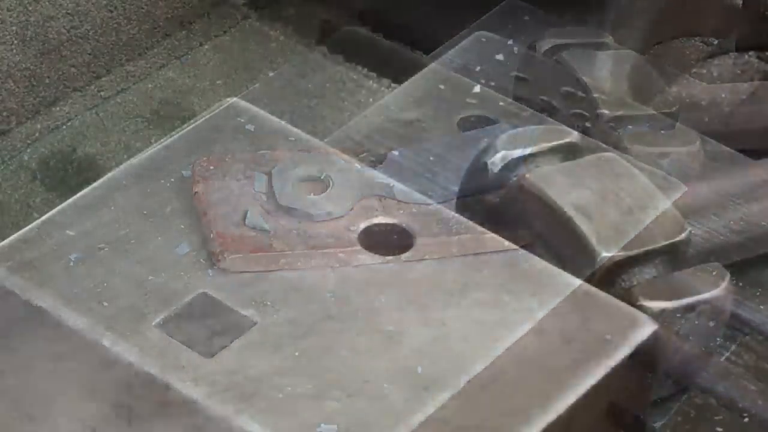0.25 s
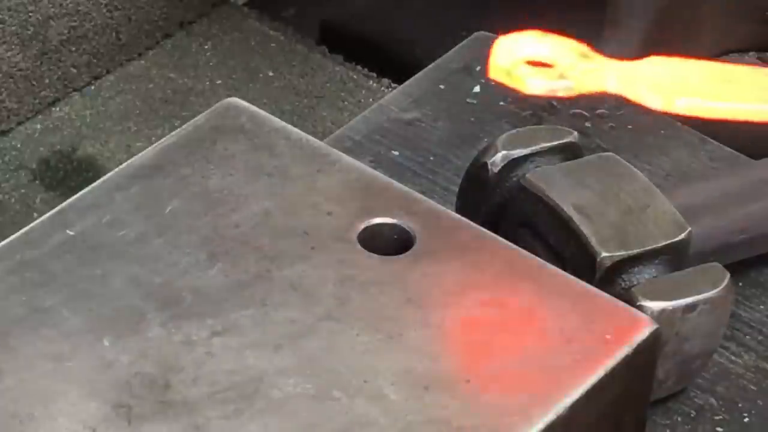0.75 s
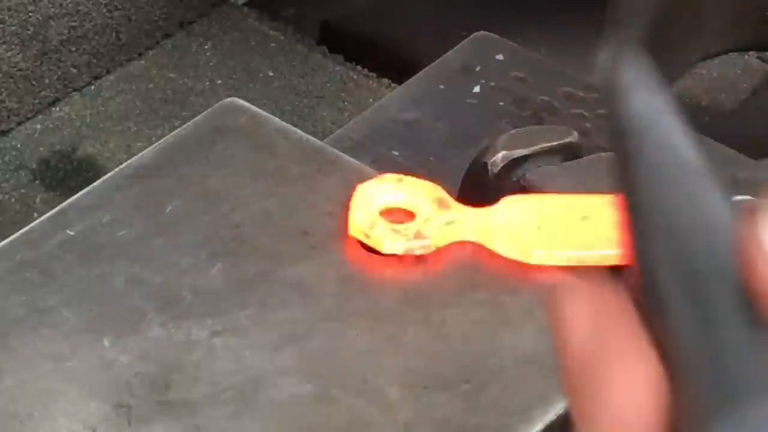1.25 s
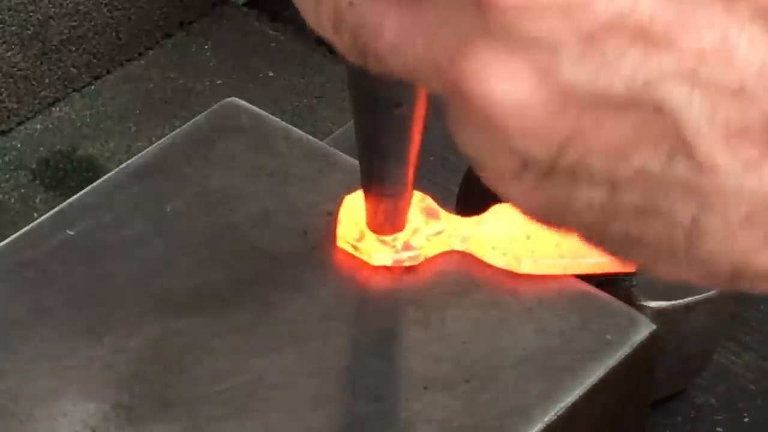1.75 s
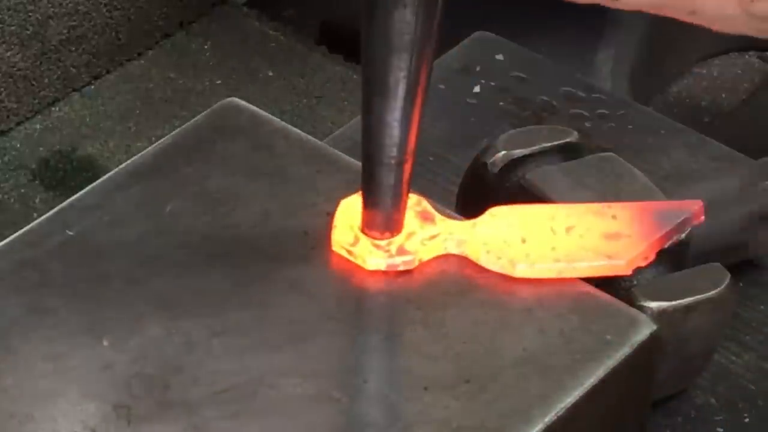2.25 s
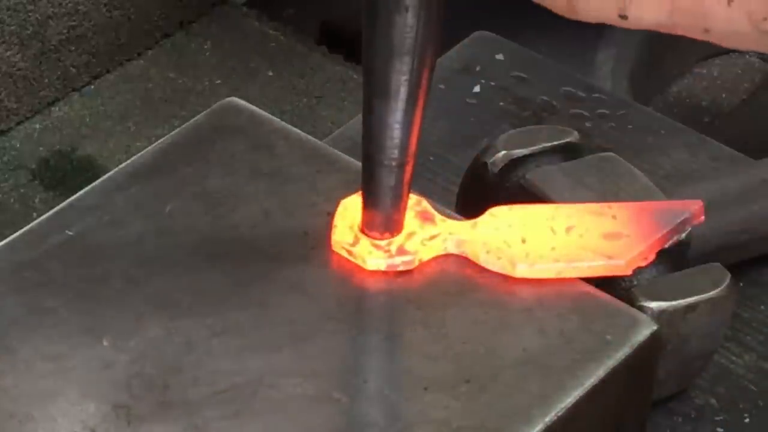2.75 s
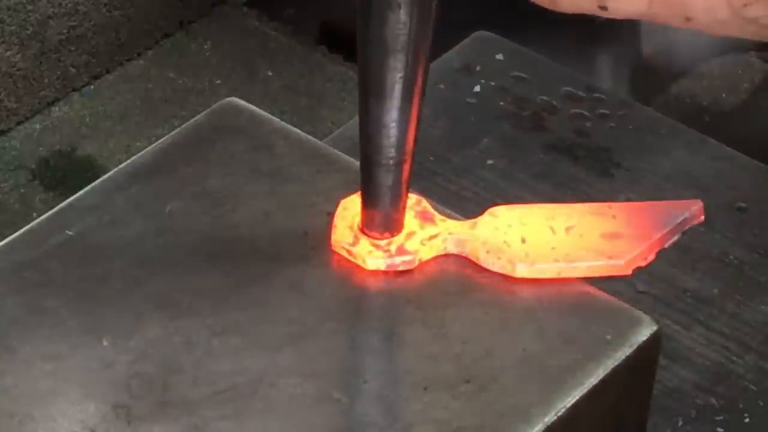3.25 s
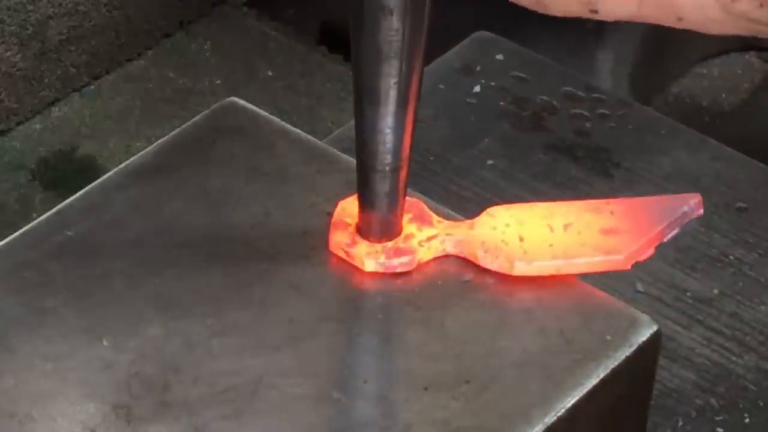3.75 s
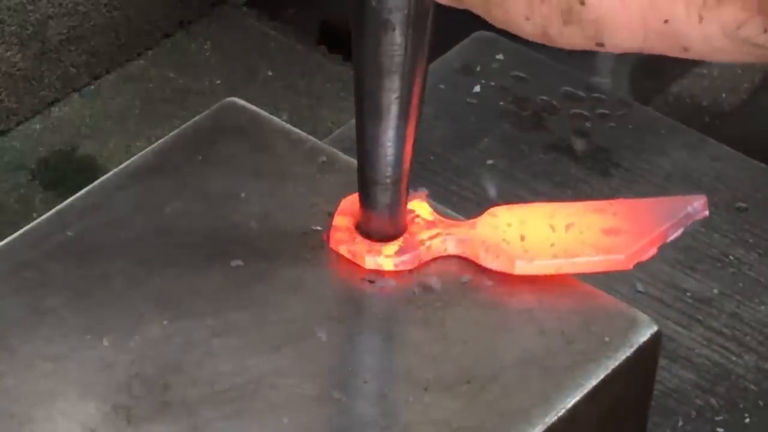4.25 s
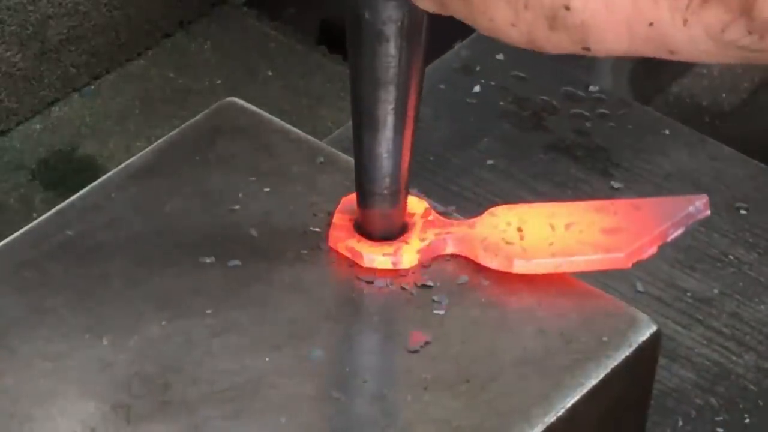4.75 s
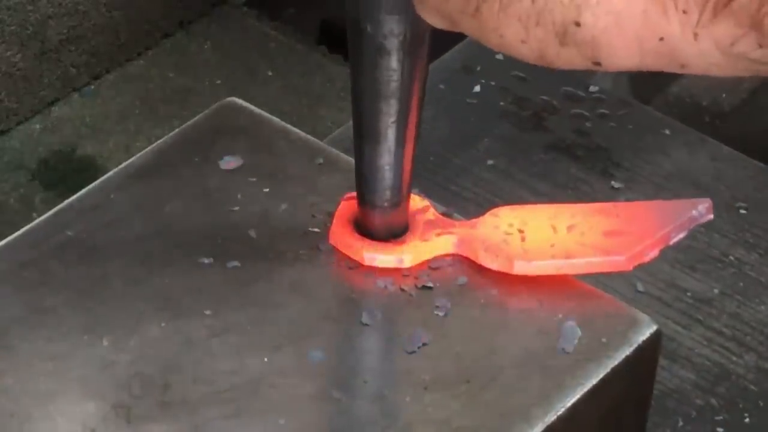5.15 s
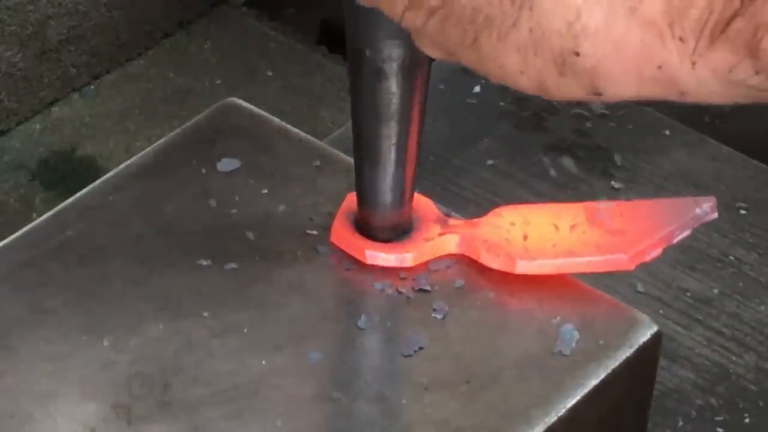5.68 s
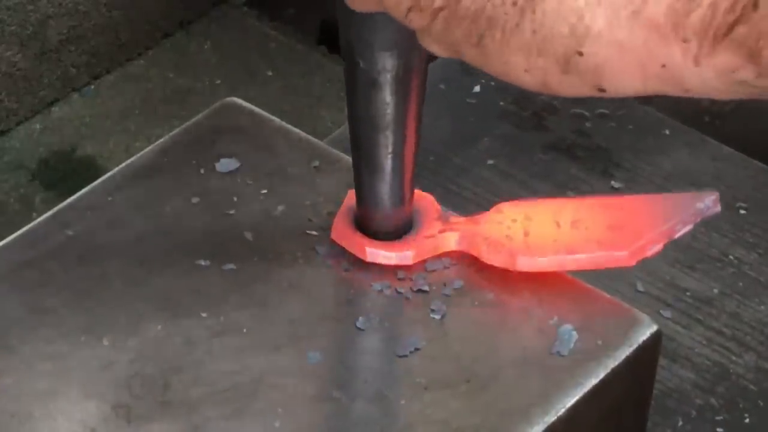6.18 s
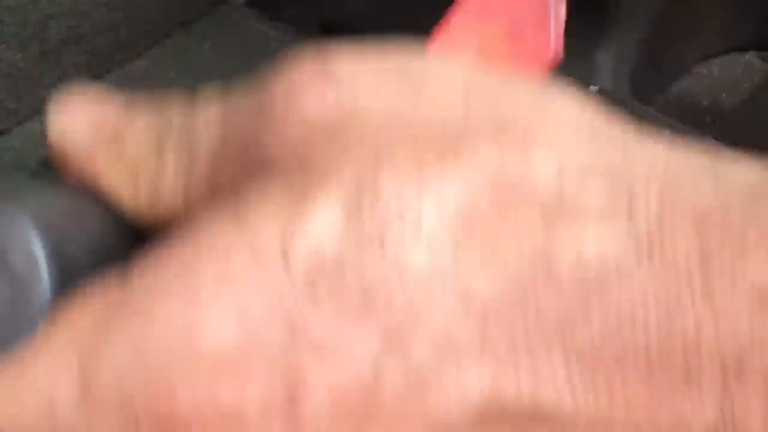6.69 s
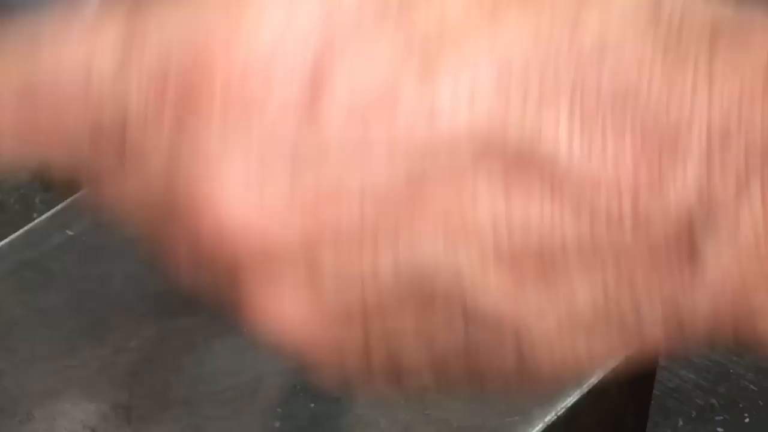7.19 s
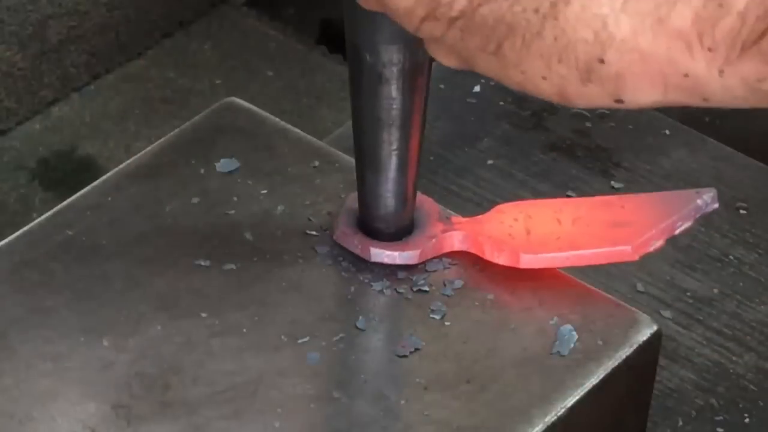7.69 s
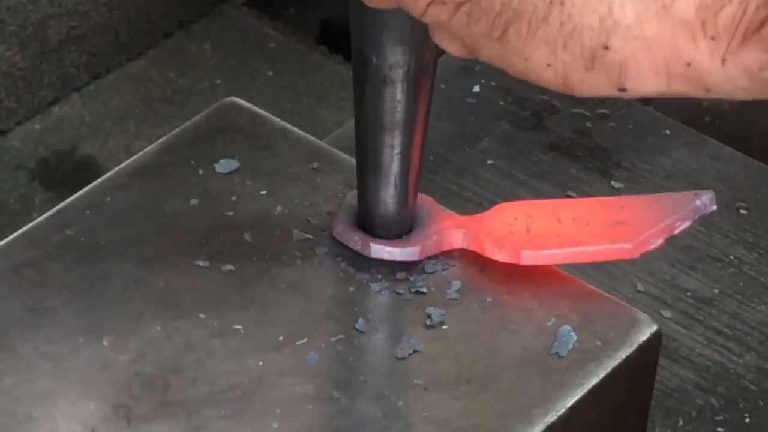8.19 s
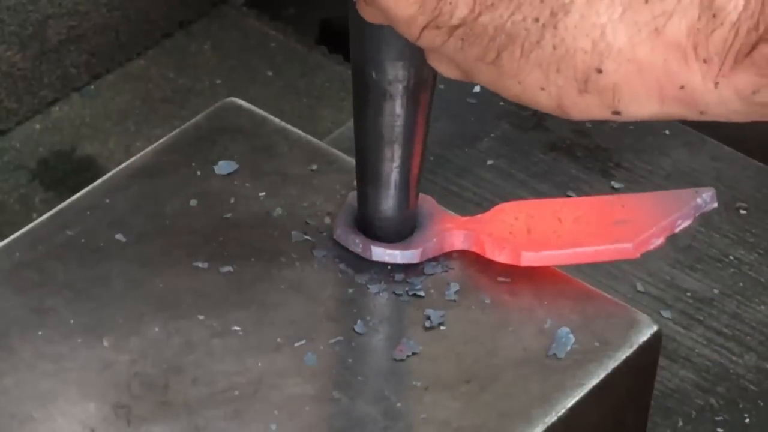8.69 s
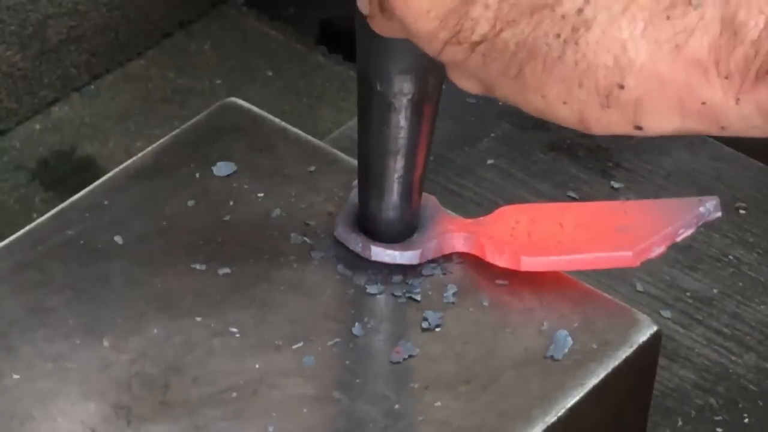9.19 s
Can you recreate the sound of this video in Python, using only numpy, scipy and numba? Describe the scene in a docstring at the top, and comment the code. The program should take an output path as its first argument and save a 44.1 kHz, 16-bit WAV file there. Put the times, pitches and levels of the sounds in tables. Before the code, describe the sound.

Eight evenly spaced hard metallic hammer blows, a pause with light ringing tool clinks, then four heavier thumping blows, over a low hissing forge.

```python
"""Hammering a drift at the anvil

A hand hammer drives a steel drift through hot steel over the hole of an anvil, in two runs of blows.
Each contact is a noise crack plus decaying modes of drift, hammer head and anvil; blows add a low thump.
A gas forge of filtered noise roars and hisses in a small workshop; scuffs, knocks and a dragged handle
are shaped noise. The recorder's gain control and limiter duck the roar after loud blows."""
import sys
import numpy as np
from scipy import signal
from scipy.fft import rfft, irfft, next_fast_len
from scipy.io import wavfile
from scipy.ndimage import uniform_filter1d, minimum_filter1d, map_coordinates
from numba import njit

SR = 44100
rng = np.random.default_rng(int(sys.argv[2]) if len(sys.argv) > 2 else 0)


def master(y):
    """Save y as 16-bit WAV."""
    cut = np.clip(np.atleast_2d(y).T, -1, 1)
    pcm = np.round(cut * 32767)  # scale
    wavfile.write(sys.argv[1], SR, pcm.astype(np.int16))


def convert_level_to_amplitude(level_db):
    """Map a level in decibels to its linear amplitude factor."""
    exponent = np.asarray(level_db, float) / 20
    return 10 ** exponent


N = 415863


def unit(x):
    """Scaled to rms 1."""
    return x / np.sqrt(np.mean(x ** 2) + 1e-20)


def along(points, hz):
    """Interpolates (Hz, value) points on a log frequency axis."""
    f, v = np.transpose(points)
    return np.interp(np.log(hz + 1), np.log(f + 1), v)


def wobble(knots_per_s):
    """Smooth random curve: a spline through normal random knots."""
    knots = rng.standard_normal(int(N * 60 / SR) + 4)
    return map_coordinates(knots, [np.arange(N) * knots_per_s / SR])


def filtered(x, response):
    """x times a response of frequency."""
    m = next_fast_len(len(x) + 8192)
    return irfft(rfft(x, m) * response(np.fft.rfftfreq(m, 1 / SR)), m)[:len(x)]


def peaks(table, f):
    """Sum of causal resonances (Hz, width Hz, dB) of alternating sign."""
    total = 0
    for k, (hz, width_hz, db) in enumerate(table):
        total = total + (-1) ** k * convert_level_to_amplitude(db) * 1j * f * width_hz / (hz * hz - f * f + 1j * f * width_hz)
    return total


def band_noise(hz, width_hz, size):
    """Noise of rms 1 through a resonance applied twice."""
    return unit(filtered(rng.standard_normal(size), lambda f: peaks([(hz, width_hz, 0)], f) ** 2))


def strokes(rows, attack_s, t60_s):
    """Envelope of (s, dB) strokes that rise quickly and die away; the highest one counts."""
    envelopes = []
    for s, db in rows:
        since_s = np.maximum(np.arange(N) / SR - s, 0)
        envelopes.append(convert_level_to_amplitude(db - 60 * since_s / t60_s) * (1 - np.exp(-since_s / attack_s)))
    return np.max(envelopes, axis=0)


def add(track, s, sound):
    """Mixes a sound in at time s."""
    part = track[round(s * SR):][:len(sound)]
    part += sound[:len(part)]


def rush(response, patchy_db):
    """Filtered noise of rms 1; its time-frequency patches vary in gain by patchy_db rms."""
    z = signal.stft(rng.standard_normal(N), nperseg=512)[2]
    field = uniform_filter1d(rng.standard_normal(z.shape), size=5, axis=0)
    field = uniform_filter1d(field, size=10, axis=1)
    noise = signal.istft(z * convert_level_to_amplitude(patchy_db * unit(field)), nperseg=512)[1][:N]
    return unit(filtered(noise, response))


def forge():
    """The flame flutters in the low roar; the gas jet hisses more evenly."""
    # Each row: time in seconds, roar level in dB before flutter.
    roar_levels = [(0.0, -37.5), (0.3, -37.5), (0.5, -34.5), (2.4, -35.5), (2.7, -35.5), (3.2, -34.5),
                   (9.4, -35)]
    # Roar spectrum. Each row: frequency in Hz, relative level in dB.
    roar_shape = [(12, -24), (20, -20.5), (53, -3.5), (75, 0.5), (120, -5.5), (160, -1.5), (290, -6),
                  (347, -4.5), (507, -10.5), (619, 0), (826, -21), (905, -14), (1080, -18.5), (1190, -21.5),
                  (1500, -32.5), (1950, -60), (3300, -120)]
    # Hiss spectrum. Each row: frequency in Hz, relative level in dB.
    hiss_shape = [(760, -32), (1300, -5), (1620, -5), (1870, -6), (2140, -9), (3250, -12.5), (4990, -20.5),
                  (8580, -23), (9820, -23.5), (11700, -22.5), (12700, -20), (15700, -18)]
    # Narrow bands added to the hiss. Each row: centre in Hz, width in Hz, gain in dB.
    whistles = [(9640, 58, 8), (10900, 110, -1.5), (13000, 69, 2)]
    # Standing waves in the shop thin the sound. Each row: centre in Hz, half width in Hz, share lost 0-1.
    nulls = [(130, 9, .55), (245, 12, .35), (295, 10, .35), (380, 14, .45), (500, 22, .45), (582, 10, .6),
             (678, 12, .7), (820, 14, .4), (955, 12, .5), (1010, 10, .55), (1185, 16, .5), (1300, 18, .35),
             (1385, 12, .35)]

    def room(f):
        return np.prod([1 - lost / (1 + ((f - hz) / half_hz) ** 2) for hz, half_hz, lost in nulls], axis=0)

    def flame(f):
        return convert_level_to_amplitude(along(roar_shape, f)) * room(f)

    def jet(f):
        return convert_level_to_amplitude(along(hiss_shape, f)) * (1 + np.abs(peaks(whistles, f))) * room(f) * (f < 15800)

    times_s, levels_db = np.transpose(roar_levels)
    roar_db = np.interp(np.arange(N) / SR, times_s, levels_db)
    hiss_db = -54.5 + 0.15 * (roar_db - roar_db.mean())  # the jet barely follows the flame
    flutter_db = 0.81 * wobble(3.684) + 1.12 * wobble(22)
    roar = convert_level_to_amplitude(roar_db + flutter_db) * rush(flame, patchy_db=0.0)
    return roar + convert_level_to_amplitude(hiss_db + 0.22 * flutter_db) * rush(jet, patchy_db=1.65)


def rub():
    """Tongs jerk over coarse scale: dense uneven grains in a broad mid band."""
    # Each row: start in seconds, level in dB.
    jerks = [(.205, -52), (.266, -43), (.31, -44), (.376, -40.5), (.462, -44.5)]
    grit = rng.standard_normal(N) * convert_level_to_amplitude(3.9 * wobble(59))
    body = unit(filtered(grit, lambda f: peaks([(1660, 1500, 0)], f) ** 2))
    return strokes(jerks, attack_s=0.0043, t60_s=0.49) * body


def handling():
    """Short scuffs, dull knocks, and a handle that catches and slips as it drags, all from shaped noise."""
    # Scuffs of tools being moved. Each row: start in seconds, peak in dB, centre in Hz, t60 in seconds.
    scuffs = [(.244, -48.5, 10500, 0.093), (0.305, -52, 5000, .04), (.329, -45, 9500, 0.018),
              (.38, -52, 3600, 0.081), (.392, -45, 12300, 0.046), (.433, -50, 6200, .02),
              (.7135, -46, 13400, .03), (2.62, -60, 6000, 0.98)]
    # Dull knocks. Each row: start in seconds, peak in dB, centre in Hz.
    knocks = [(1.319, -41.5, 2570), (3.202, -27.5, 3020), (3.217, -29, 3040), (9.404, -45, 3200)]
    # Narrow core, broad tail. Each row: share of the knock's centre, width in Hz, level in dB, t60 in seconds.
    knock_parts = [(1.0, 400, 0, 0.1), (0.82, 2000, -8, 0.19)]
    # Slips of the handle. Each row: start in seconds, level in dB.
    slips = [(2.842, -51.5), (2.911, -48), (2.927, -42.5), (2.937, -42.5), (2.974, -44), (2.999, -40),
             (3.016, -47), (3.078, -52.5)]
    # Resonances of the chatter. Each row: centre in Hz, width in Hz, level in dB.
    rattle_body = [(3600, 96, -3.5), (5860, 190, -0.5), (8900, 190, -3), (12700, 500, -13)]

    out, t = np.zeros(N), np.arange(SR // 2) / SR
    for s, db, hz, t60_s in scuffs:
        add(out, s, convert_level_to_amplitude(db - 60 * t / t60_s) * band_noise(hz, 0.72 * hz, size=len(t)))
    for s, db, hz in knocks:
        for share, width_hz, part_db, t60_s in knock_parts:
            envelope = convert_level_to_amplitude(db + part_db - 60 * t / t60_s)
            add(out, s, envelope * band_noise(share * hz, width_hz, size=len(t)))

    attack_s = 0.00092
    friction = rng.standard_normal(N) * convert_level_to_amplitude(1.7 * wobble(55))  # catches and lets go
    chatter = unit(filtered(friction, lambda f: 0.077 * (f > 2500) + peaks(rattle_body, f)))
    drag = strokes(slips, attack_s, t60_s=0.15) * chatter
    tick = convert_level_to_amplitude(-6) * strokes(slips, attack_s / 4, t60_s=0.028) * band_noise(9000, 11000, size=N)
    # the handle's low bump against the stand
    bump = strokes([(2.905, -27)], attack_s=0.0098, t60_s=0.37) * band_noise(103, 73, size=N)
    return out + drag + tick + bump


def dying_noise(stretch, size):
    """Noise whose every frequency dies at the workshop's own speed, times stretch."""
    # Each row: frequency in Hz, t60 in seconds at stretch 1.
    shop = [(800, 0.25), (2500, 0.25), (6000, .26), (11000, 0.19), (16000, 0.041)]
    hz, t, z = signal.stft(rng.standard_normal(size), SR, nperseg=128)
    t60_s = stretch * along(shop, hz)[:, None]
    return signal.istft(z * convert_level_to_amplitude(-60 * t / t60_s), SR, nperseg=128)[1][:size]


def ring(hz, modes, t, spread_db, extra_blur_hz=0, damping_db_per_s=0):
    """One object's modes, each struck at a new strength; a wandering phase widens the lines."""
    db, t60_s, blur_hz = np.transpose(modes)[:, :, None]
    hold = 50  # samples per phase step
    steps = rng.standard_normal((len(modes), len(t) // hold))
    wander = np.repeat(np.cumsum(steps, axis=1), hold, axis=1)
    wander = wander * np.sqrt(2 * np.pi * (blur_hz + extra_blur_hz) * hold / SR)
    level_db = db + spread_db * steps[:, -1:] - (60 / t60_s + damping_db_per_s) * t
    phase = 2 * np.pi * np.outer(hz, t) + wander + 3 * steps[:, -2:-1]
    return np.sum(convert_level_to_amplitude(level_db) * np.sin(phase), axis=0)


def contact(drift_db, hammer_db, anvil_db, tilt_db, anvil_tilt_db, grip, stretch, wet_db):
    """Steel meets steel: a crack that fills the shop, three ringing bodies and their echoes."""
    # Crack spectrum before tilt. Each row: frequency in Hz, level in dB.
    crack_shape = [(410, -56.5), (700, -23.5), (969, -1.5), (1380, -7), (1790, -3.5), (2710, -0.5),
                   (3130, -1), (4450, -5), (6930, -2), (10700, -12.5), (11500, -3.5), (12500, -12),
                   (15100, -4), (15800, -14.5)]
    # Mode pitches in Hz; the lowest of the drift rises with grip.
    drift_hz, hammer_hz, anvil_hz = [2490, 6630, 6703, 6870, 11500, 15700], [10120, 11710, 13500, 14585], [4840, 5303, 6050, 8306, 9222,
                                                                          9781, 11230, 13770]
    # Modes, blurred by close neighbours. Each row: level in dB before tilt, t60 in seconds, blur in Hz
    # (grip damps and blurs the drift's lowest further).
    drift_modes, hammer_modes, anvil_modes = [(-0.5, 0.87, 4.5), (-3, 0.11, 25), (-8, 0.07, 4),
                                              (-4, 0.14, 25), (-20.5, .13, 50), (-26, .07, 40)], [(-9, 0.16, 160), (-1, 0.24, 4.5),
                                                             (-1, 0.17, 130), (0, 0.17, 50)], [(-20.5, 0.34, 3),
                                                                             (-13.5, 0.33, 5.3),
                                                                             (-2.5, 0.17, 160),
                                                                             (-19.5, 0.23, 3),
                                                                             (-12.5, 0.27, 6.1),
                                                                             (-34.5, 2.1, 1.4),
                                                                             (-14, 0.24, 4), (-24, .45, 3)]

    t = np.arange(SR) / SR
    # both tilts are in dB per octave
    crack = filtered(dying_noise(stretch, size=SR),
                     lambda hz: convert_level_to_amplitude(along(crack_shape, hz) + tilt_db * np.log2((hz + 1) / 4000)))
    direct = 0.54 * convert_level_to_amplitude(-60 * t / 0.0022)  # the direct sound leads the echoes
    crack = crack / np.std(crack[:400]) * (1 + direct)

    held_hz = [drift_hz[0] * (1 + 0.29 * grip), *drift_hz[1:]]  # a seated tip stiffens the lowest bending mode
    seat = np.sqrt(grip * (np.arange(len(drift_modes)) == 0)[:, None])  # the seat rattles and damps the tip
    drift = ring(held_hz, drift_modes, t, spread_db=0.0, extra_blur_hz=300 * seat, damping_db_per_s=840 * seat)

    # a dull blow spares the high modes
    face = [(db + 9 * tilt_db * np.log2(hz / 11000), *rest) for hz, (db, *rest) in zip(hammer_hz, hammer_modes)]
    hammer = ring(hammer_hz, face, t, spread_db=4.5)

    # the spot touched tilts the anvil's modes
    spot = [(db + anvil_tilt_db * np.log2(min(hz, 9300) / 6000), *rest)
            for hz, (db, *rest) in zip(anvil_hz, anvil_modes)]
    anvil = ring(anvil_hz, spot, t, spread_db=3.0)

    steel = convert_level_to_amplitude(drift_db) * drift + convert_level_to_amplitude(hammer_db) * hammer + convert_level_to_amplitude(anvil_db) * anvil
    tail = dying_noise(0.63, size=SR // 4)
    echoes = signal.fftconvolve(steel, tail / np.linalg.norm(tail))[:SR]  # echoes roughen the lines
    return crack + steel + convert_level_to_amplitude(wet_db) * echoes


def taps():
    """The drift is set down, seated and knocked lightly; touches soon after still its ring by their grip."""
    # Each row: start in seconds, strength in dB, drift ring in dB re strength,
    # anvil brightness in dB per octave, grip on the drift 0-1.
    touches = [(1.32, -44.5, -14, 13.5, 0.02), (3.2004, -35.5, -11, 6, 0.55), (3.217, -48, -11, 2, 0.6),
               (6.351, -58, 11.5, .1, 0.45), (6.875, -44.5, 16.5, -20, 0), (6.915, -50, 5, -9, 0.05),
               (6.936, -46, 8, -6, 0.08), (6.949, -52, 6, -6, 0.27), (7.295, -45.5, 7, -14, 0.2),
               (7.4679, -38.5, 12, -3, 0.01), (7.478, -43, 15.5, 4, 0.31), (9.406, -55, 7, 1, 0.3)]
    out, t = np.zeros(N), np.arange(SR) / SR
    for s, db, drift_db, anvil_tilt_db, grip in touches:
        anvil_db = 3.5 - 33 * np.sqrt(grip)  # a bare touch rings the anvil, soft steel around the tip mutes it
        stilled_db = 0
        for later, *_, firm in touches:
            if s < later < s + 0.1:
                stilled_db = stilled_db - 2500 * firm * np.maximum(t + s - later, 0)
        hammer_db = -8 if grip >= 0.6 else -68  # the hammer only touches a seated drift
        tilt_db, stretch = -0.5 - 7.8 * grip, 0.02 + 0.32 * grip  # a firm seat: duller, fills the room more
        sound = contact(drift_db + stilled_db, hammer_db, anvil_db, tilt_db, anvil_tilt_db, grip, stretch,
                        wet_db=-10.5)
        add(out, s, convert_level_to_amplitude(db) * sound)
    return out


def blows():
    """Heavy blows, each with a thump through the stand: a sine gliding down to 45 Hz, just after the crack."""
    # Each row: start in seconds, strength in dB (9 dB above the level used), drift ring in dB and
    # hammer ring in dB re that level, thump in dB.
    blow_rows = [(3.6541, -11.5, -13, -2, -45), (3.964, -8, -7, -9, -18), (4.2851, -5.5, -6.5, -2.5, -16),
                 (4.635, -4.5, -7, -2, -22), (5.0022, -4, -5.5, -1.5, -21), (5.362, -2.5, 0.5, 2.5, -11.5),
                 (5.721, -5, 2, -4.5, -43), (6.0705, -4.5, 0, -8, -38), (8.0887, -1, 5, 0, -5.5),
                 (8.5042, -1.5, 3, 1, 6.5), (8.9, -1.5, -1, 2.5, 1.5), (9.258, -6, 2, 1.5, -18.5)]
    out, t = np.zeros(N), np.arange(SR // 4) / SR
    cycles = 45 * t + 2.0 * (1 - np.exp(-t / 0.0027))
    thump = -np.sin(2 * np.pi * cycles) * convert_level_to_amplitude(-60 * t / 0.075) * (1 - np.exp(-t / 0.0036))
    for s, db, drift_db, hammer_db, thump_db in blow_rows:
        working_s = s - blow_rows[0][0]
        # the steel cools and the drift wedges in: the anvil rings less;
        # what the hammer face does not ring with goes into the anvil
        anvil_db = -4 - 0.5 * working_s - 0.44 * hammer_db
        sound = contact(drift_db, hammer_db, anvil_db, tilt_db=-1.5, anvil_tilt_db=-0.1 * working_s,
                        grip=0.93, stretch=0.85, wet_db=-2.0)
        add(out, s, convert_level_to_amplitude(db - 9) * sound)
        add(out, s + 0.00071, convert_level_to_amplitude(thump_db) * thump)
    return out


def scene():
    """All sources at the one microphone."""
    return (forge() + rub() + handling() + taps() + blows())[None]


@njit
def follow(wanted_db, fall, rise_db):
    """Gain that sinks quickly toward the wanted value and climbs back at a steady rate (per sample)."""
    gain = np.zeros(len(wanted_db))
    for i in range(1, len(gain)):
        if wanted_db[i] < gain[i - 1]:
            gain[i] = gain[i - 1] + fall * (wanted_db[i] - gain[i - 1])
        else:
            gain[i] = min(wanted_db[i], gain[i - 1] + rise_db)
    return gain


def band_limit(x):
    """A steep low-pass at the top of the band."""
    return signal.sosfilt(signal.butter(12, 17050, fs=SR, output="sos"), x)


def record(dry):
    """Band limit, slow gain control, then a fast limiter on the short-term rms."""
    x = filtered(dry[0], lambda f: 1 / np.sqrt(1 + (f / 15950) ** 60))

    level_db = 10 * np.log10(np.abs(uniform_filter1d(x ** 2, size=882)) + 1e-12)
    wanted_db = np.minimum(-23.0 - level_db, 0)
    wanted_db = minimum_filter1d(wanted_db, size=3001, origin=1500)  # holds before it recovers
    fall_s, rise_db_per_s = 0.058, 32
    x = x * convert_level_to_amplitude(follow(wanted_db, 1 / (fall_s * SR), rise_db_per_s / SR))

    short_rms = np.sqrt(np.abs(uniform_filter1d(x ** 2, size=133)) + 1e-12)  # single peaks slip through
    needed = np.minimum(convert_level_to_amplitude(-16) / short_rms, 1)
    x = x * uniform_filter1d(minimum_filter1d(needed, size=221), size=111)
    return band_limit(x[None])


dry = scene()
out = record(dry)
master(out)
```